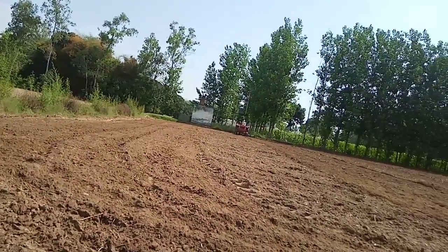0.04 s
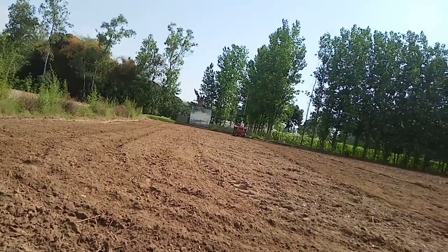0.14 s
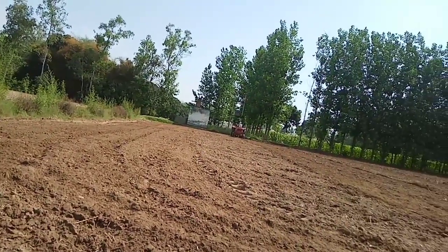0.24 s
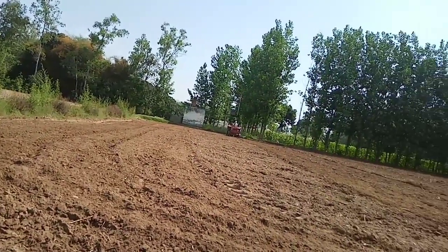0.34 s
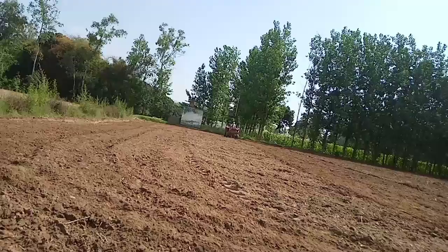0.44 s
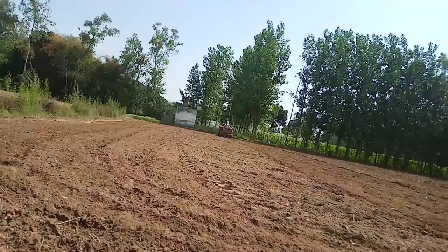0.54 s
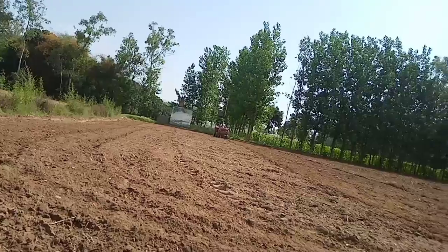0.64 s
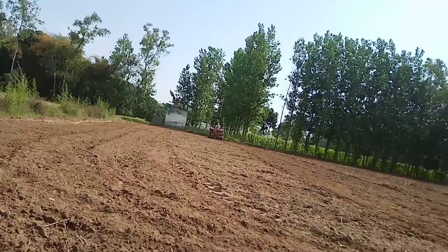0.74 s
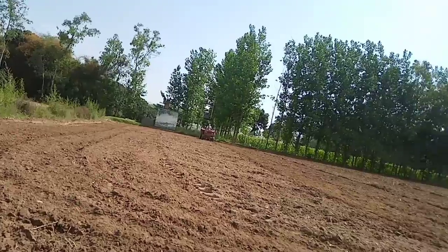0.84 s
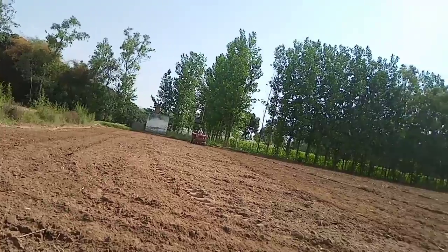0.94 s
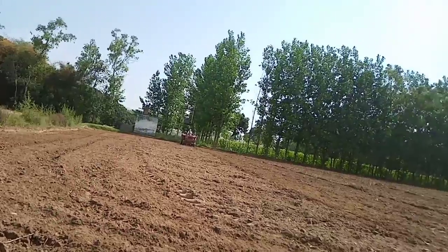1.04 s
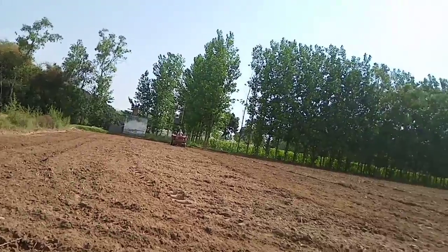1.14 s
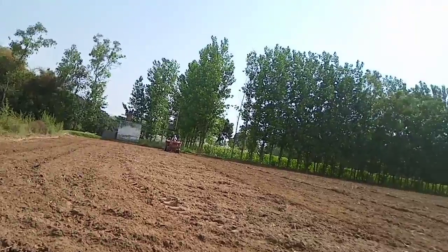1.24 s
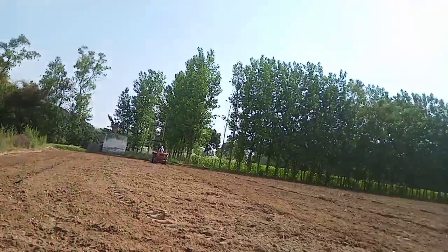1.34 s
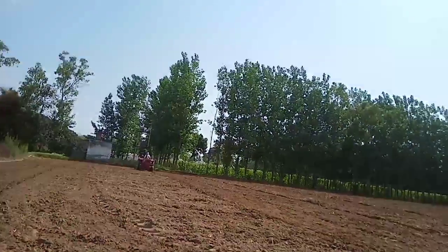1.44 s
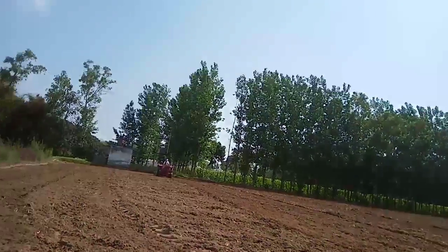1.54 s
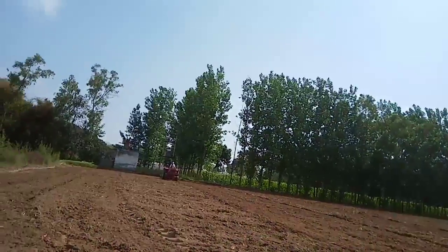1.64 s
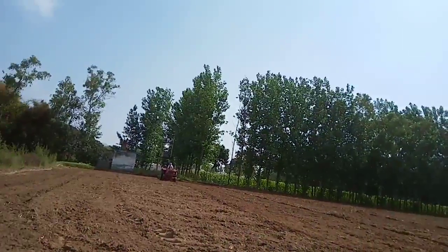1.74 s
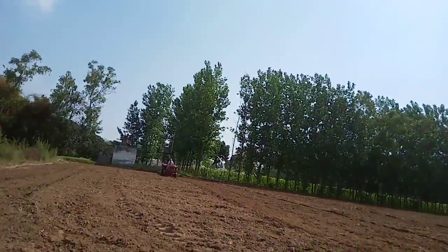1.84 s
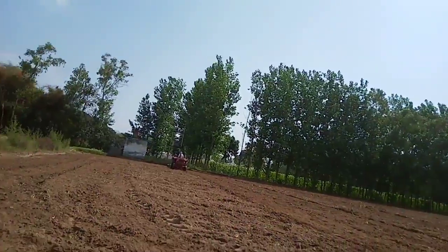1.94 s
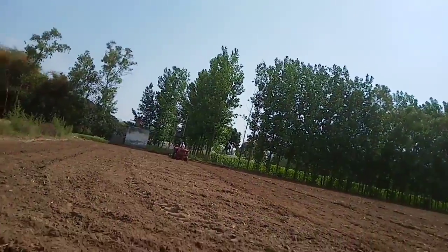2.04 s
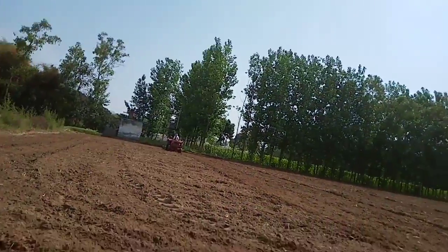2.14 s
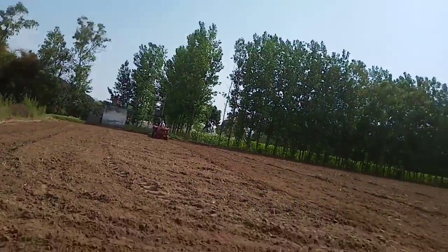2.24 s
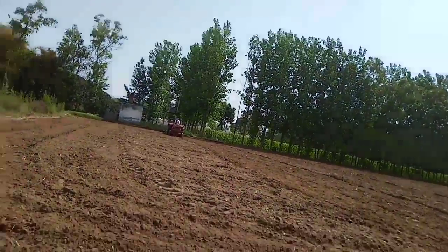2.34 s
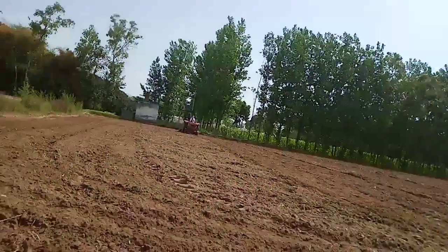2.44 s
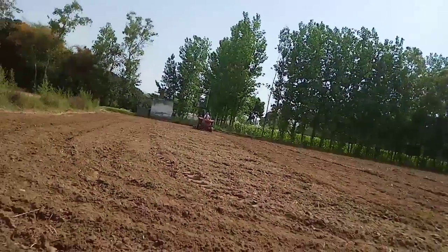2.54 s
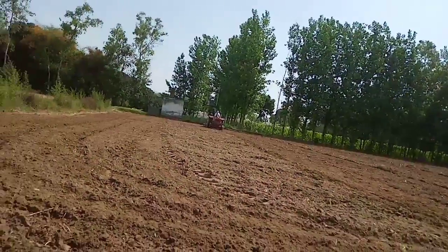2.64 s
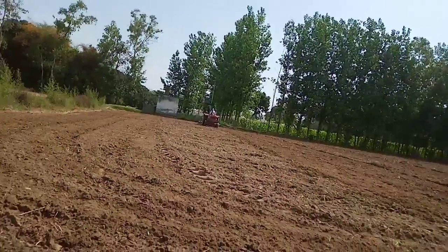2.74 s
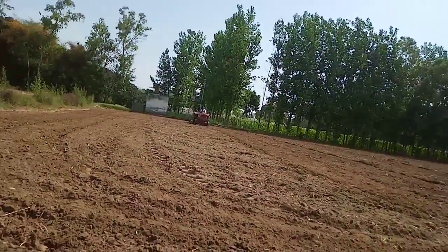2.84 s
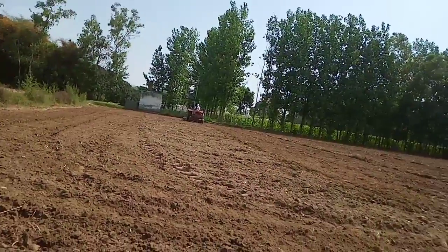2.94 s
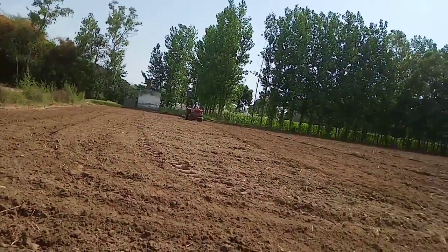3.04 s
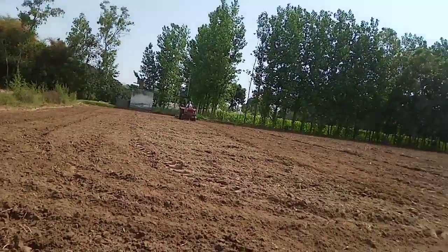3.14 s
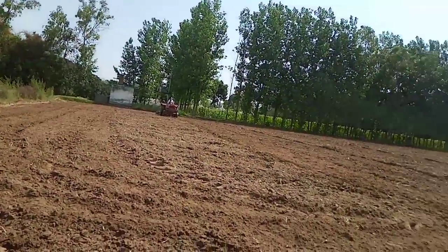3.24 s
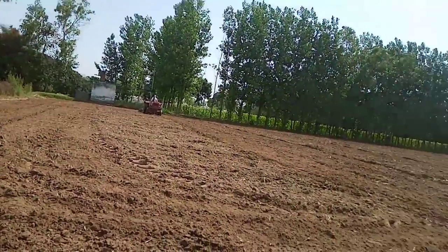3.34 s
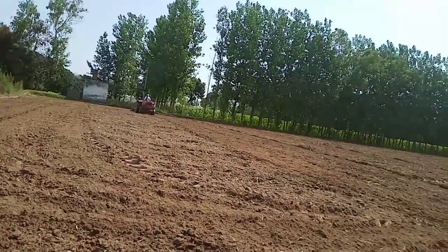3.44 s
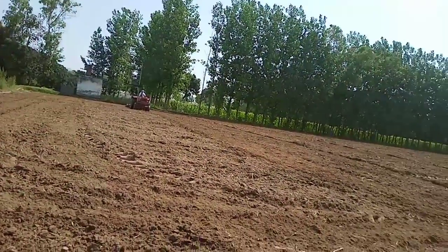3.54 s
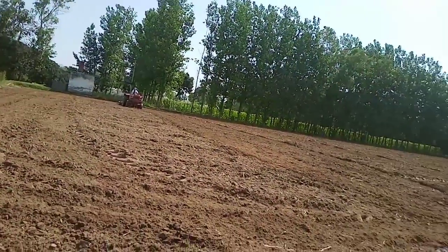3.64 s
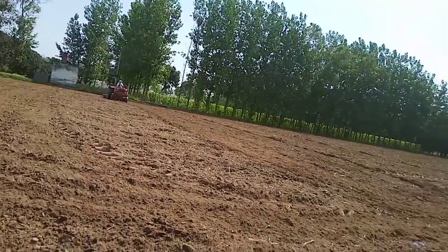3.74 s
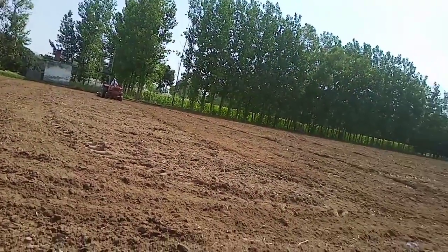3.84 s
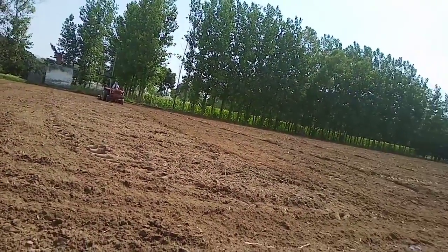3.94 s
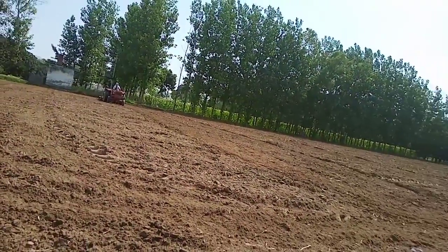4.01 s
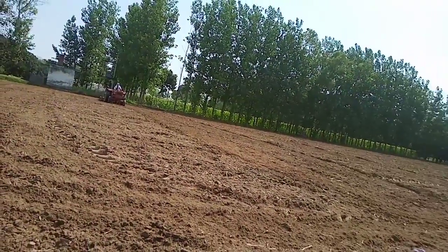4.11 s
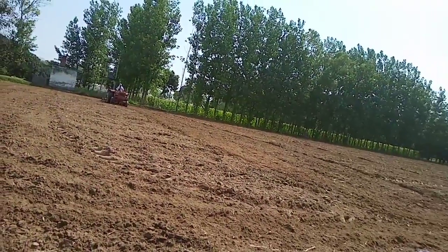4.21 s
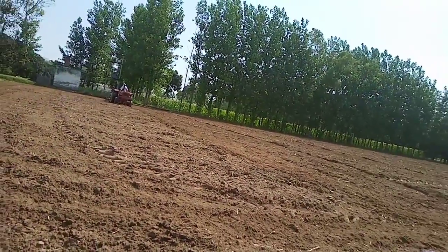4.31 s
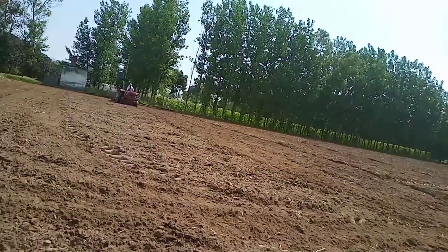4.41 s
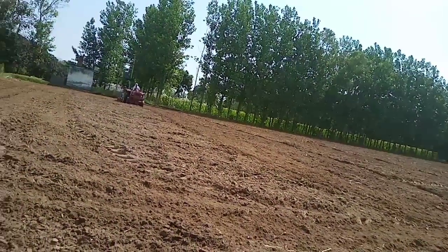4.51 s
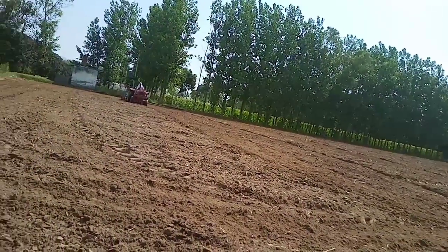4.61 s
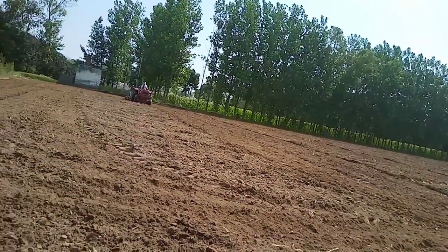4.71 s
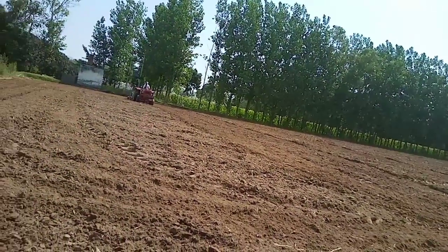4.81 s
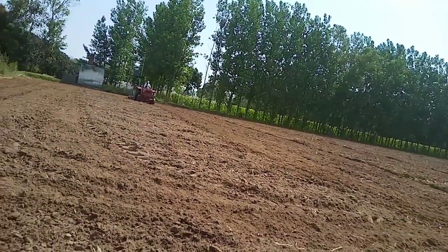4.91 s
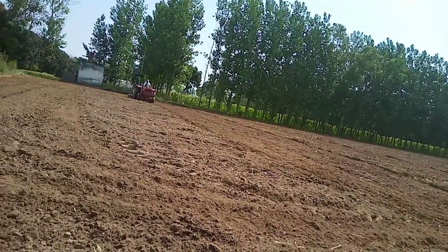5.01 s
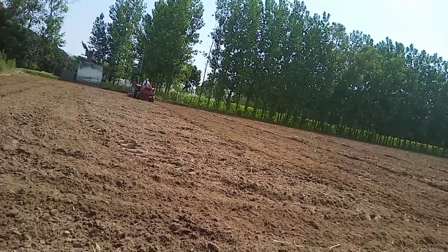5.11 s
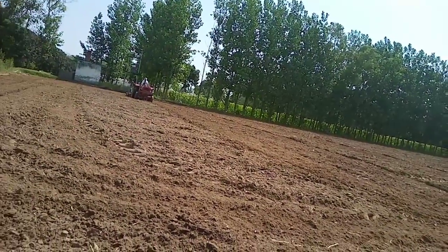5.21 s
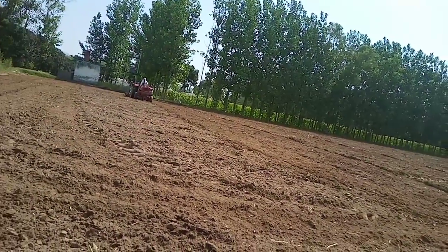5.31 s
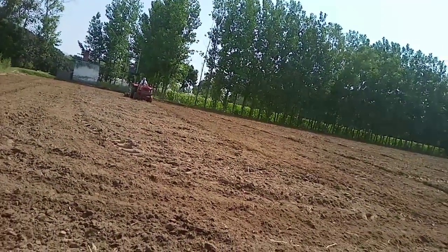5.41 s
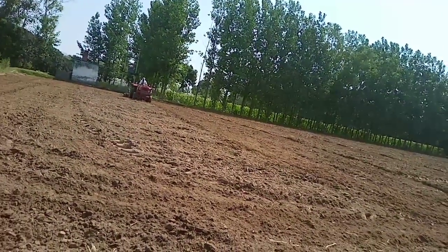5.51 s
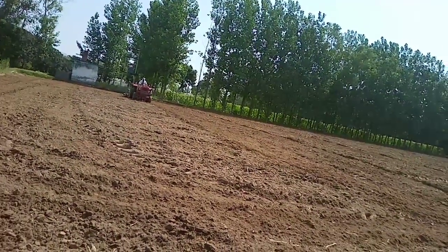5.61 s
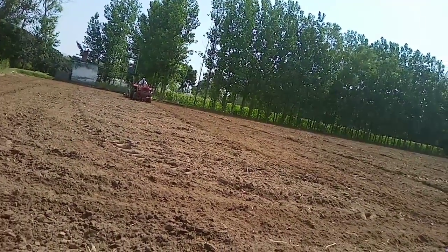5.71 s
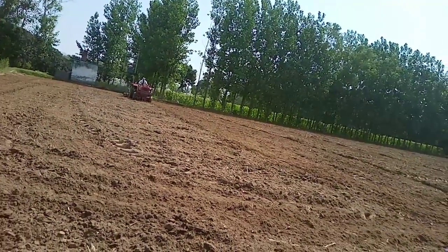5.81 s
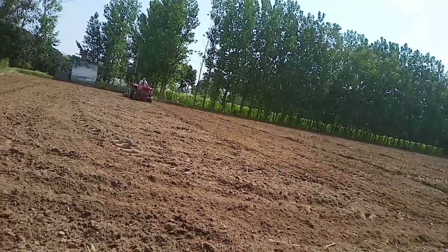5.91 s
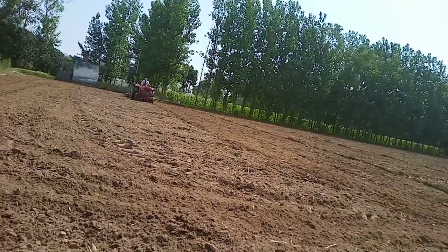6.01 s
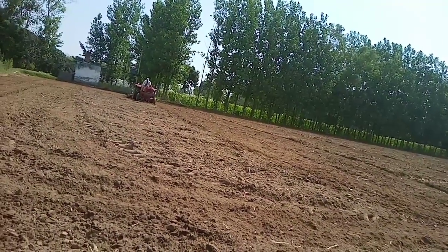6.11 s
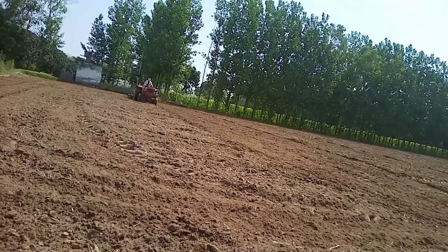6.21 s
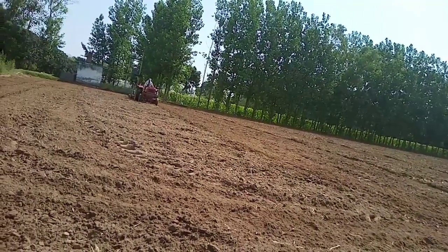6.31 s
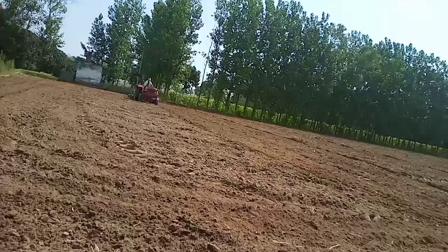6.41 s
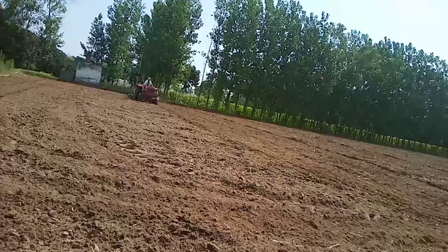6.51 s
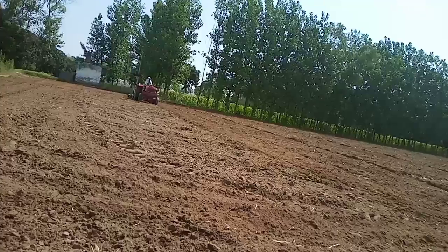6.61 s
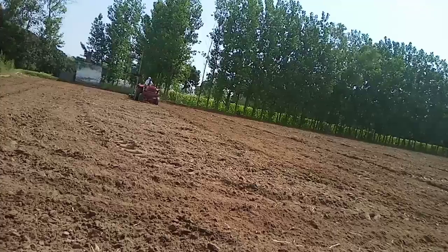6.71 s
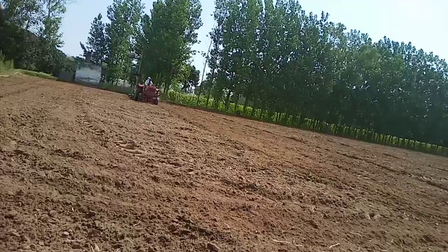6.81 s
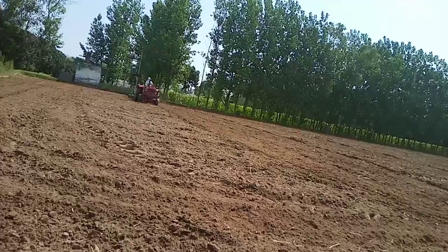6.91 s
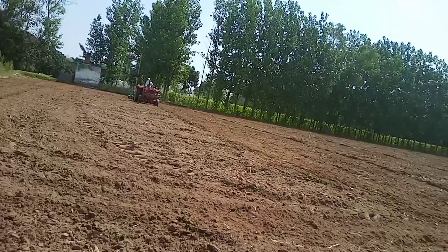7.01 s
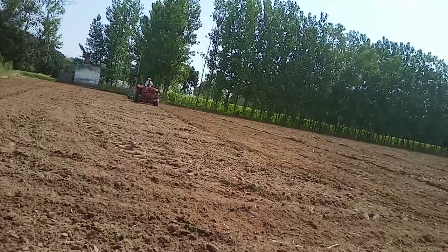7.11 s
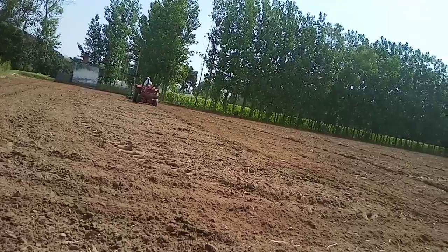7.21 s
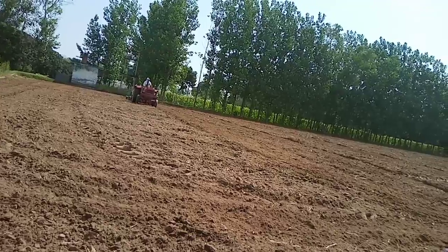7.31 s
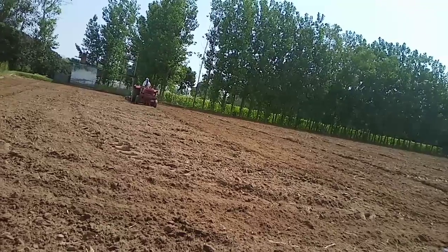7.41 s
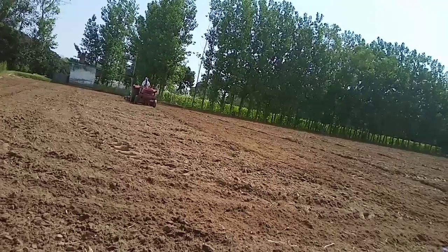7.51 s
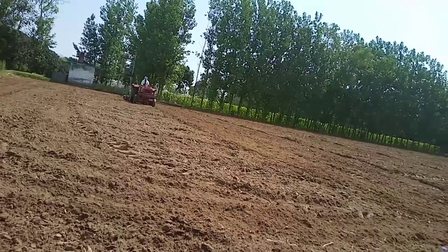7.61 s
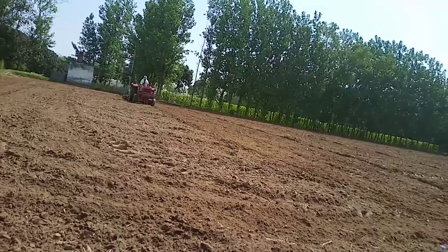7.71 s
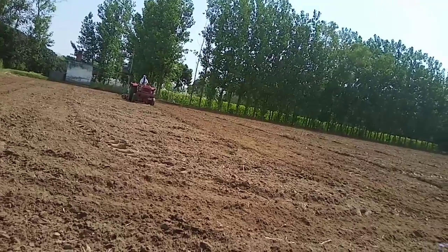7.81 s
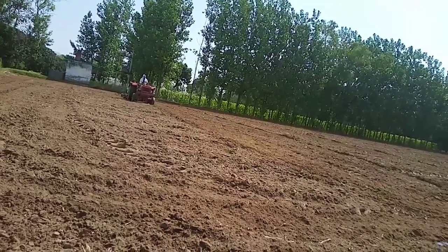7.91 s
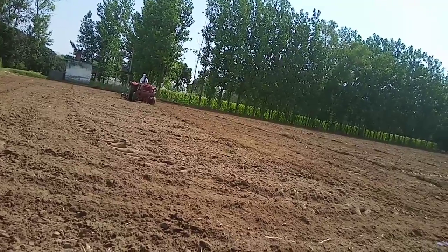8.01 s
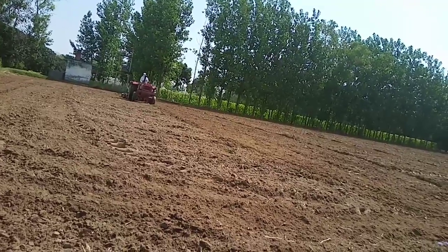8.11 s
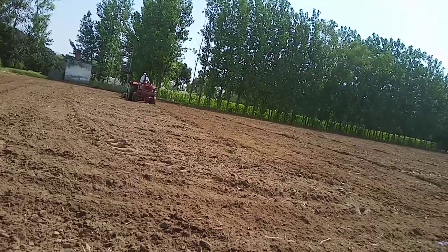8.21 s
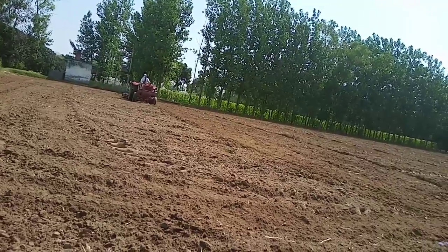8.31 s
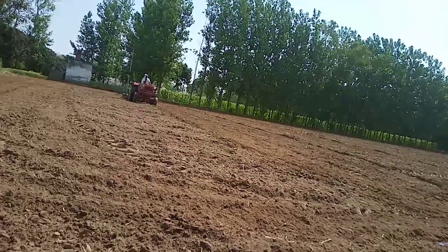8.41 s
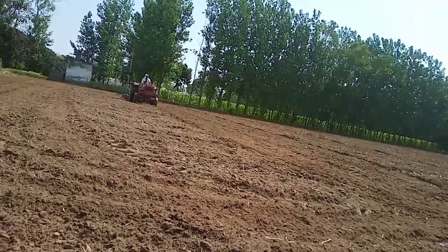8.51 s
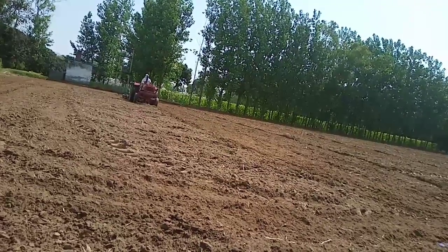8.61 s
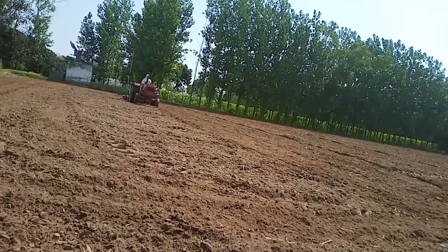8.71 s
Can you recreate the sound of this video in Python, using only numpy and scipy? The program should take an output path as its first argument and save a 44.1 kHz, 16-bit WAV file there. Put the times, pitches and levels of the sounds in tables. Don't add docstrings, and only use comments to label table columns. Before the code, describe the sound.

Distant four-cylinder tractor chugs closer across a ploughed field, rough and hissy, with one sharp dry snap near the microphone and faint metallic squeaks.

```python
import sys
import numpy as np
from scipy import signal
from scipy.io import wavfile
from scipy.ndimage import uniform_filter1d

SR = 44100
rng = np.random.default_rng(int(sys.argv[2]) if len(sys.argv) > 2 else 0)


def dump(signal):
    limited = np.clip(np.atleast_2d(signal).T, -1, 1)
    pcm = np.round(limited * 32767).astype(np.int16)
    wavfile.write(sys.argv[1], SR, pcm)


def nominal_scale(level):
    x = np.asarray(level, float) / 20
    return 10 ** x


N = 385875
TIME = np.arange(N) / SR
SLOW = TIME[::64]
FRAME = 1024

# time_s, firing_rate_hz
ENGINE_SPEED = [(0, 59.29), (.3, 58.32), (.6, 59.39), (.9, 58.47), (1.5, 59.25), (1.8, 57.73), (2.1, 58.26),
                (2.4, 57.58), (2.7, 58.65), (3.6, 57.73), (3.9, 56.91), (4.8, 58.19), (5.1, 57.7),
                (6, 57.28), (6.3, 57.65), (7.2, 57.02), (8.1, 57.7), (8.75, 57.12)]
# time_s, load_db
ENGINE_LOAD = [(0, -0.2), (2.0, 0.2), (2.5, 1.5), (3.4, 2), (4.4, 0.6), (4.8, -0.7), (5.2, 1.3), (6, 2.1),
               (7.2, 1.1), (8.75, -0.3)]
# time_s, dip_db
WHEEL_JOLTS = [(.62, 2), (2.19, 3.5), (3.03, 1), (3.46, 4), (3.81, 11), (3.9, 8), (4.8, -1), (5.23, 5),
               (6.2, 3.5), (6.9, 4)]
# multiple of firing rate, order followed, level_db below it
SIDE_ORDERS = [(.25, 1, -18), (0.751, 1, -21), (1.25, 1, -21), (1.5, 2, -22), (1.752, 2, -23.5),
               (2.25, 2, -25), (2.5, 2, -29), (2.75, 3, -6.5), (3.39, 3, -8.5), (4, 3, -11),
               (4.999, 3, -19.5), (7.5, 3, -15), (8, 3, -20.5)]
# start_cycles, hold_cycles, fall_db_per_cycle, depth_db, rise_s, scatter_db, grit_db,
# knock size (times the noise)
FIRING_BURSTS = [
    (.68, 0.24, 29, 6, 0.0048, 2.6, 1, 9.6),
    (.66, 0.13, 30, 5.5, 0.0037, 1.2, 1, 4.9),
    (0.61, 0.37, 26, 5.5, 0.0018, 1.8, 1.5, 3.2),
    (.53, 0.071, 23, 12.5, 0.0032, 2, 3.5, 3.3),
]
CYLINDERS_DB = [-0.68, 0.29, 0.81, -0.0079]
# time_s, boost_db
HARD_BURNS = [(.505, 3), (3.438, 4), (7.157, 2.5)]
# frequency_hz, density_db_per_hz
BARK = [
    [(190, -63), (330, -39), (420, -22), (480, -42), (524, -9.5), (729, 1.5), (975, -6.5), (1190, -9),
     (1500, -10.5), (1950, -53), (3300, -120)],
    [(190, -53), (330, -37), (667, 6.5), (854, 0), (927, 1), (1170, -5), (1200, 4), (1320, 0.5), (1500, -7),
     (1950, -31), (3300, -120)],
    [(190, -47), (330, -41), (425, -4.5), (483, -8.5), (587, -0.5), (933, 1.5), (1280, -8), (1430, -19),
     (1500, -10), (1950, -26), (3300, -120)],
]
CLATTER = [
    [(820, -31), (1400, -7), (1560, -29), (1590, -4), (1700, -5), (1900, -12), (2120, -9.5), (2350, -9),
     (2710, -4.5), (3100, -7), (4200, -10), (5460, -21.5), (9240, -120)],
    [(820, -46), (1400, -14), (1490, 4.5), (1610, 2.5), (1710, 4.5), (1880, -4), (2250, 2), (2710, 0),
     (2870, -2.5), (3220, 1), (4200, -0.5), (5460, -8), (9240, -120)],
    [(820, -38), (1400, -4.5), (1470, -32), (1610, 0.5), (1660, -0.5), (1900, -10), (2180, -4.5),
     (2500, -3.5), (2950, -3.5), (3160, -5), (3830, -8), (4090, -17), (4200, -10), (5460, -25),
     (9240, -120)],
]
HISS = [
    [(2470, -59), (4200, -1), (4360, -33), (4680, 1.5), (5780, 0.5), (6310, -1), (6770, 3), (7420, -1),
     (8500, -12), (11000, -29), (18700, -120)],
    [(2470, -35), (4200, -20.5), (5060, -5), (5790, -3), (6200, -13), (6460, -2.5), (6850, 0), (7640, -2.5),
     (8500, -12), (11000, -20), (18700, -120)],
    [(2470, -27), (4200, -11.5), (4620, -2), (5120, -2.5), (5570, 1.5), (6070, -5), (6580, -3), (7550, -10),
     (8500, -13.5), (11000, -34), (18700, -120)],
]
TICK = [
    [(5000, -34), (8500, -9), (10000, -3.5), (11200, -5), (12800, -15), (13700, -20), (14900, -24),
     (16000, -25)],
    [(5000, -30), (8500, -3), (9320, 0), (10000, 0), (12200, -4.5), (13800, -14), (15300, -21),
     (16000, -28)],
    [(5000, -43), (8500, -2), (9080, -3.5), (9830, 1.5), (11100, -1.5), (11600, -5), (12800, -10),
     (15300, -18), (16000, -21)],
]
# frequency_hz, width_hz, level_db
PANELS = [(1675, 32, 2), (2182, 24, 6), (2647, 22, 6), (2948, 27, 6.5), (3840, 56, 1.5), (1394, 46, -6),
          (4190, 86, -3.5)]

# frequency_hz, level_db, t60_s
SNAP_MODES = [(2660, 0.5, 0.004), (4030, -5, 0.0016), (5200, 5, 0.0018), (7500, -4, 0.003),
              (10100, 3, 0.0011), (11500, -2, .0015), (13500, -11, .002)]
# start_s, length_s, from_hz, to_hz, level_db
SQUEAKS = [(1.04, 0.056, 3100, 3080, -43), (1.957, 0.027, 3600, 3530, -38.5),
           (1.975, 0.033, 3300, 3200, -38.5), (6.515, .06, 3580, 3600, -35.5),
           (8.405, .042, 3400, 3310, -36)]
# frequency_hz, density_db_per_hz
SOIL_RUMBLE = [(18, -20), (32, -20), (44, -29), (70, -8), (90, 9.5), (140, 4), (200, -1.5), (240, -23),
               (290, -50), (400, -70)]
# middle_s, half_length_s, boost_db
ROUGH_GROUND = (3.95, 0.72, 7.9)
# frequency_hz, density_db_per_hz
WIND_COLOUR = [(20, -40), (100, -35), (190, 1), (300, -11.5), (400, -11.5), (520, -24), (700, -50)]
# middle_s, half_length_s, boost_db
WIND_PUFFS = [(.02, 0.033, 12), (.5, .04, 6), (1.17, .04, 12), (1.8, .04, 8), (2.6, 0.13, 10), (3.3, .2, 3),
              (4.0, .14, 11), (4.38, 0.12, 12), (5.2, 0.12, 5), (5.6, 0.25, 5), (6.2, 0.12, 12),
              (6.65, .1, 8), (7.1, 0.19, 7.5), (7.6, 0.11, 5.5), (8.3, 0.16, 2)]

# far_level_db, db per db of approach, db per db of clear air
ORDERS_PATH = [
    (-43.5, 0.85, 0.26),
    (-31, 1, 0.14),
    (-61.5, 3.5, 0.37),
]
LAYERS_PATH = [
    (-45, 1.65, 0.39),
    (-40, 0.98, 0.28),
    (-42, 1.05, 0.78),
    (-56, 1.86, 1.1),
]
SOIL_PATH = (-48.5, 1.08, 0.22)
WIND_PATH = (-76, 4, 0.98)
# start_s, gain_db, fade_s
CLEAR_SPELLS = [(0, 10.5, .25), (.45, 14, 0.061), (.71, 11, 0.095), (1.14, 6, 0.057), (1.42, 3.5, 0.35),
                (1.75, 4.5, 0.15), (2.27, 5.5, 0.4), (2.9, 4, 0.66), (3.45, 4, 0.53), (3.8, 6.5, 1),
                (4.9, 3, 0.9), (5.4, 1.5, 0.44), (5.95, 1.5, 0.41), (6.5, 3, 0.6), (7.05, 4, 0.32),
                (7.5, 2.5, 0.24), (7.97, 6, 0.18), (8.45, 4.5, 0.33)]
# middle_s, half_length_s, depth_db, frequency_hz, width_hz
HOLLOW = (4.0, 0.6, -5.5, 400, 138)
# frequency_hz, width_hz, level_db, db per db of clear
TOP_AIR = (14000, 2200, -3.5, .6)

# time_s, pose (0 away, 1 aside, 2 facing)
PHONE_POSE = [(0, 0), (2.0, 0), (2.35, 1.17), (3.2, 1.2), (3.6, 1.74), (4.6, 2), (8.75, 2)]
# frequency_hz, width_hz, level_db
ASIDE_NOTCH = (1260, 160, -10.5)
# time_s, stretch of resonances (1 = rest), palm (0-2), fingers (0-2), top_opening_db
HAND_GRIP = [(0, 1.01, 1.1, .3, -2), (1.1, 1.04, 0.54, .3, -1), (1.35, .9, 1.3, .4, -3),
             (1.9, 0.85, 0.58, .5, 3), (2.3, 0.91, 0.79, .1, 3), (2.8, 1.07, .7, .2, -4),
             (3.05, 1, 0.54, 0.83, 4), (3.45, 0.96, 0.73, .6, -5), (3.9, 1, 1.5, 1.8, -3),
             (4.5, .97, 1.4, .7, -4), (4.85, 0.93, 1.2, .9, -11), (5.1, 0.93, 1, 0.7, -3),
             (5.6, 0.91, 0.71, 0.61, -1), (6.1, 0.93, .1, 0.62, 3), (6.6, .99, 0.083, .9, -1),
             (7.1, 1.03, 0.085, 1.5, 2), (7.7, 0.99, .1, 1, -1), (8.75, 1.01, 0.59, .6, 1)]
# frequency_hz, width_hz, palm_db, fingers_db
HAND_RIDGES = [(6650, 980, 6.5, 0), (11300, 770, -0.2, 4), (8530, 720, -.5, -4.5)]


def exhaust(turns, levels_db):
    out = np.zeros(N)
    for order, phase, waver_db in [(1, 2.1, 0.7), (2, 0.046, 0.92), (3, 0.29, 0.56)]:
        level_db = levels_db[order - 1] + waver_db * wander(hz=24.87)
        out += nominal_scale(level_db) * np.cos(2 * np.pi * order * turns + phase)
    for multiple, leader, db in SIDE_ORDERS:
        drift = 2 * np.pi * rng.random() + 0.5 * wander(hz=4)
        far_db = 0.33 * max(multiple - 3, 0) ** 0.59 * np.minimum(levels_db[2] + 43, 0)
        level_db = levels_db[int(leader) - 1] + db + far_db + 4.0 * wander(hz=8)
        out += nominal_scale(level_db) * np.cos(2 * np.pi * multiple * turns + drift)
    return np.sqrt(2) * out


def engine_block(turns, shared_db):
    out = np.zeros(N)
    burn = np.clip(rng.standard_normal((600, 6)), -1.8, 1.8)
    luck = rng.random((600, 8))
    layers = zip(FIRING_BURSTS, [BARK, CLATTER, HISS, TICK], LAYERS_PATH)
    for k, (burst, spectra, path) in enumerate(layers):
        start, hold, fall_db, depth_db, rise_s, scatter_db, grit_db, knock = burst
        cycle = turns + 4 - start
        firing = cycle.astype(int)
        phase = cycle % 1

        uneven_db = scatter_db * (0.27 * burn[firing, 0] + 0.28 * burn[firing, k + 1])
        strength_db = uneven_db + np.take(CYLINDERS_DB, (firing + 1) % 4)
        if k > 1:
            for s, db in HARD_BURNS:
                strength_db = strength_db + db * (firing == firing[round(s * SR)])
        shape_db = -np.clip(fall_db * (phase - hold), 0, depth_db)
        gate = uniform_filter1d(nominal_scale(strength_db + shape_db), max(round(rise_s * SR), 1))

        grit = nominal_scale(grit_db * evened(uniform_filter1d(rng.standard_normal(N), size=60)))
        late = phase > 0.04 + 0.16 * luck[firing, k]
        onset = np.maximum(np.diff(late.astype(float), prepend=1), 0)
        blow = onset * np.sign(luck[firing, k + 4] - 0.5)
        drive = gate * (grit * rng.standard_normal(N) + knock * blow)
        out += nominal_scale(heard_db(*path)) * coloured(drive, spectra, shared_db)
    return out


def near_snap():
    out, t = np.zeros(N), np.arange(1500) / SR
    ring = np.zeros(len(t))
    for k, (hz, db, t60) in enumerate(SNAP_MODES):
        ring += (-1) ** k * nominal_scale(db - 60 * t / t60) * np.sin(2 * np.pi * hz * t)
    ring = ring * (1 - np.exp(-t / 0.00015))
    ring = signal.sosfilt(signal.butter(4, 1200, "high", fs=SR, output="sos"), ring)
    ring = ring / abs(ring).max()
    reflection = nominal_scale(-16) * np.roll(ring, round(0.0022 * SR))
    at = round(1.1718 * SR)
    out[at:at + len(t)] += nominal_scale(-10) * (ring + reflection)
    return out


def bearing_squeaks():
    out = np.zeros(N)
    for s, length, from_hz, to_hz, db in SQUEAKS:
        hz, at = np.linspace(from_hz, to_hz, round(length * SR)), round(s * SR)
        tone = np.sin(2 * np.pi * np.cumsum(hz) / SR)
        out[at:at + len(hz)] += nominal_scale(db) * signal.windows.tukey(len(hz), 0.5) * tone
    return out


def soil(shared_db):
    level_db = heard_db(*SOIL_PATH) + bumps([ROUGH_GROUND])
    return nominal_scale(level_db) * coloured(rng.standard_normal(N), [SOIL_RUMBLE], shared_db)


def wind(shared_db):
    level_db = heard_db(*WIND_PATH) + bumps(WIND_PUFFS) + 2.2 * wander(hz=16)
    return nominal_scale(level_db) * coloured(rng.standard_normal(N), [WIND_COLOUR], shared_db)


def path_db(patchy_db):
    hz = np.fft.rfftfreq(FRAME, 1 / SR)[:, None]
    t = np.arange(4 * N // FRAME + 2) * FRAME / 4 / SR
    patches = rng.standard_normal((len(t), len(hz))).T
    patches = uniform_filter1d(uniform_filter1d(patches, size=4, axis=0), size=60, axis=1)
    stretch, palm, fingers, open_db = [np.interp(t, TIME, v) for v in columns(HAND_GRIP)]
    aside = np.clip(1 - abs(np.interp(t, *np.transpose(PHONE_POSE)) - 1), 0, 1)

    peaks = list(PANELS)
    for centre, width, palm_db, fingers_db in HAND_RIDGES:
        peaks.append((centre * stretch, width, palm_db * palm + fingers_db * fingers))
    peaks.append((*HOLLOW[3:], np.interp(t, TIME, bumps([HOLLOW[:3]]))))
    peaks.append((*ASIDE_NOTCH[:2], ASIDE_NOTCH[2] * aside))
    clear_db = np.interp(t, SLOW, clear_air_db())
    peaks.append((*TOP_AIR[:2], TOP_AIR[2] + TOP_AIR[3] * clear_db + open_db))
    bells = sum(db * np.exp(-((hz - centre) / width) ** 2) for centre, width, db in peaks)
    return patchy_db * evened(patches) + bells


def heard_db(far_db, per_approach, per_clear):
    start_m, drive_m_per_s = 44.7, 2.843
    approach_db = 20 * np.log10(start_m / (start_m - drive_m_per_s * SLOW))
    return np.interp(TIME, SLOW, far_db + per_approach * approach_db + per_clear * clear_air_db())


def clear_air_db():
    out, rise_s = np.zeros(len(SLOW)), 0.044
    for s, db, fade in CLEAR_SPELLS:
        age = np.maximum(SLOW - s, 0)
        out += db * np.minimum(age / rise_s, 1) * np.exp(-age / fade)
    return out


def coloured(x, spectra, shared_db):
    hz, t, z = signal.stft(x, SR, nperseg=FRAME, noverlap=FRAME * 3 // 4)
    pose = np.minimum(np.interp(t, *np.transpose(PHONE_POSE)), len(spectra) - 1)
    share = np.clip(1 - abs(pose - np.arange(len(spectra))[:, None]), 0, 1)
    pose_db = np.transpose([read(s, hz) for s in spectra]) @ share
    gain = nominal_scale(pose_db + shared_db[:, :len(t)])
    z = z * gain / np.linalg.norm(gain, axis=0)
    return evened(signal.istft(z, SR, nperseg=FRAME, noverlap=FRAME * 3 // 4)[1][:N])


def read(points, hz):
    f, db = np.transpose(points)
    return np.interp(np.log(hz + 1), np.log(f + 1), db, left=-120, right=-120)


def bumps(rows):
    swell = sum(db * np.exp(-((SLOW - s) / half) ** 2) for s, half, db in rows)
    return np.interp(TIME, SLOW, swell)


def wander(hz):
    steps = rng.standard_normal(400)
    rough = np.interp(TIME * np.clip(hz, 1, 40), np.arange(400), steps)
    return evened(uniform_filter1d(uniform_filter1d(rough, size=900), size=700))


def columns(rows):
    s, *values = np.transpose(rows)
    return [np.interp(TIME, s, v) for v in values]


def evened(x):
    return x / np.sqrt(np.mean(x ** 2) + 1e-20)


def scene():
    turns = -0.163 + np.cumsum(columns(ENGINE_SPEED)[0]) / SR
    shared_db = path_db(patchy_db=1.98)
    jolts_db = bumps([(s, 0.011, db) for s, db in WHEEL_JOLTS])
    push_db = columns(ENGINE_LOAD)[0] - jolts_db
    boom_turns = turns + 0.018 * wander(hz=5)
    boom = exhaust(boom_turns, [heard_db(*row) + push_db for row in ORDERS_PATH])
    tractor = boom + engine_block(turns, shared_db)
    mix = tractor + near_snap() + bearing_squeaks() + soil(shared_db) + wind(shared_db)
    return mix[None]


def low_pass(x):
    return signal.sosfilt(signal.butter(12, 16480, fs=SR, output="sos"), x)


def record(dry):
    lowpass = signal.firwin(511, 15620, window=("kaiser", 9), fs=SR)
    limited = signal.oaconvolve(dry, lowpass[None], "same")
    return low_pass(limited)


dry = scene()
out = record(dry)
dump(out)
```